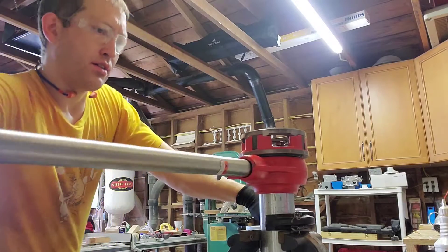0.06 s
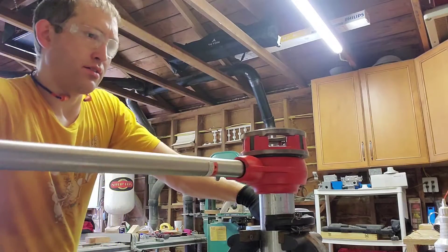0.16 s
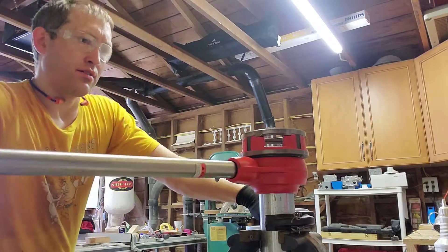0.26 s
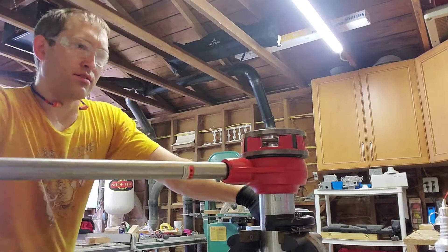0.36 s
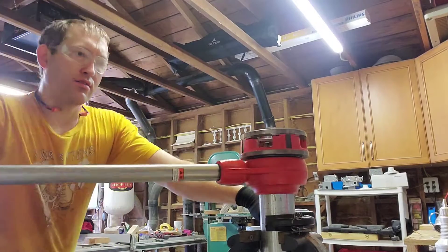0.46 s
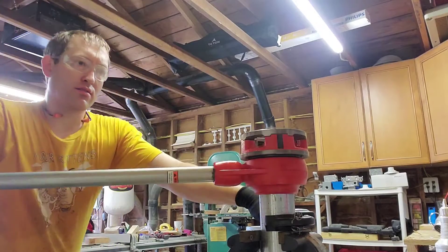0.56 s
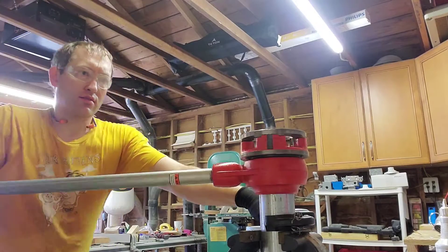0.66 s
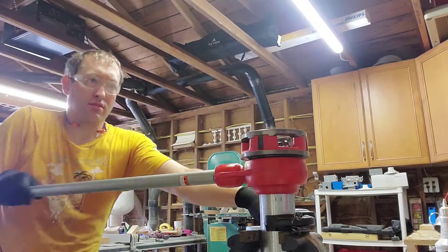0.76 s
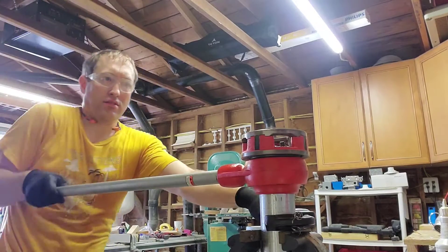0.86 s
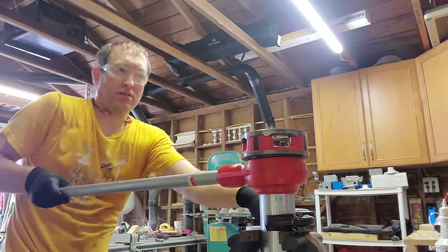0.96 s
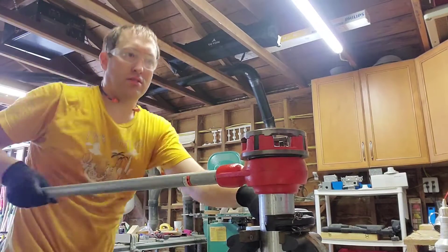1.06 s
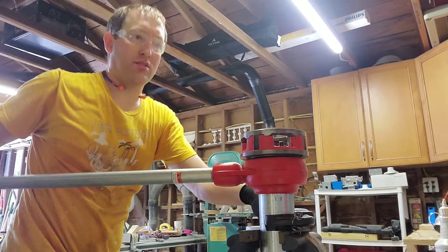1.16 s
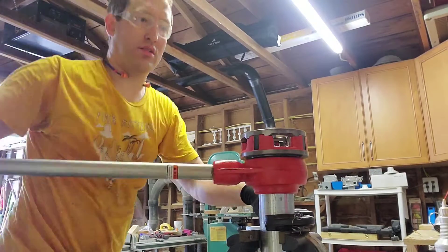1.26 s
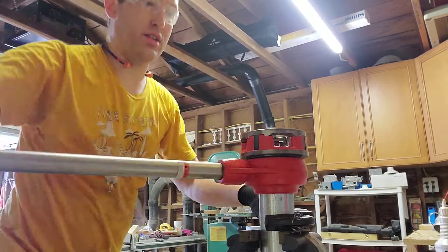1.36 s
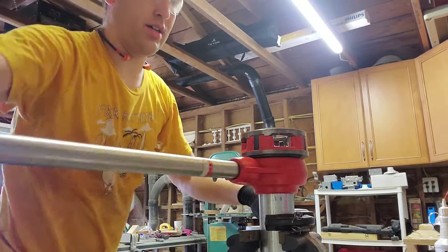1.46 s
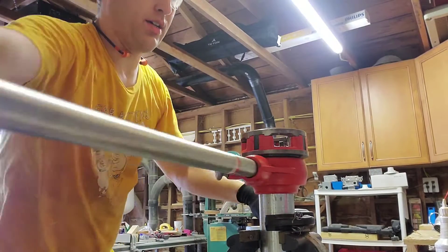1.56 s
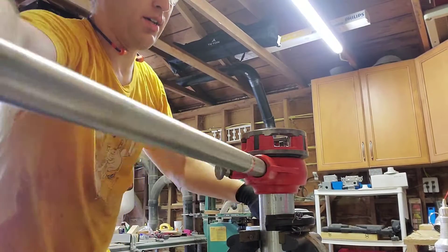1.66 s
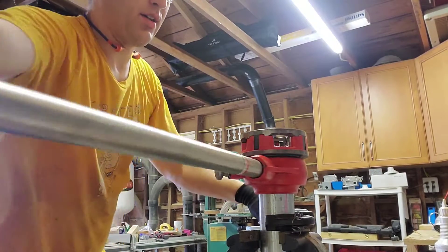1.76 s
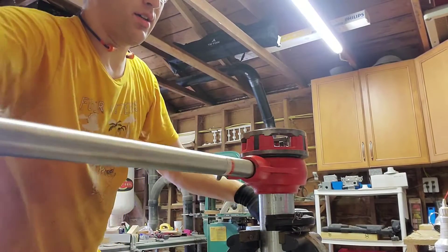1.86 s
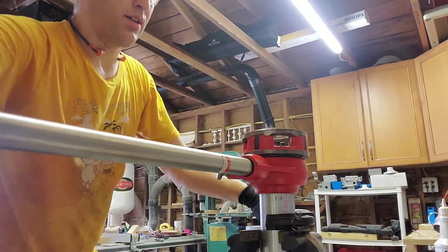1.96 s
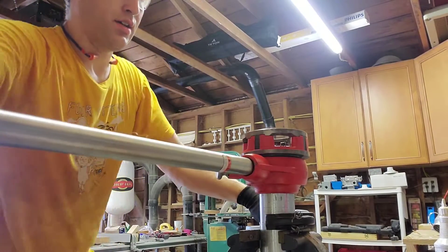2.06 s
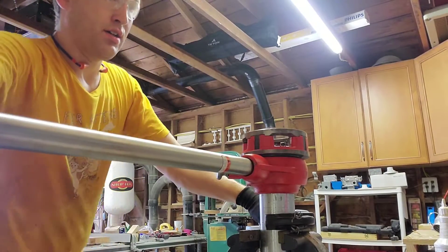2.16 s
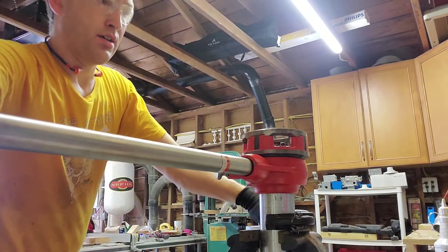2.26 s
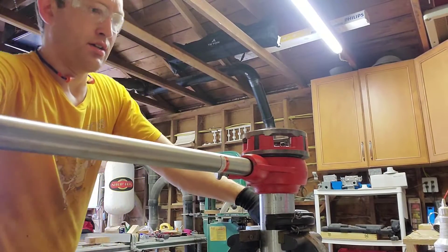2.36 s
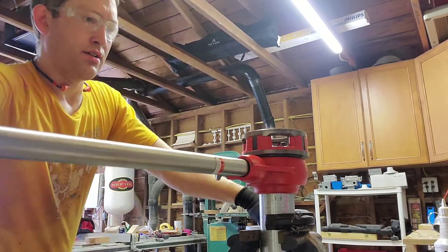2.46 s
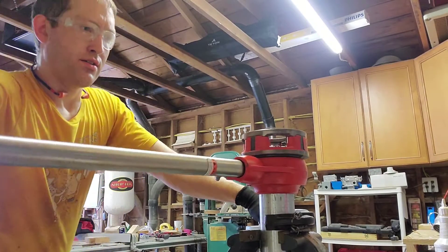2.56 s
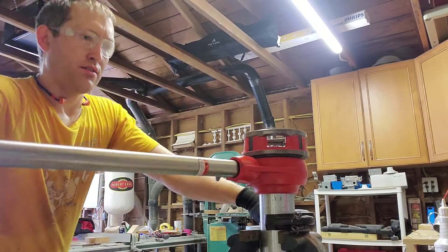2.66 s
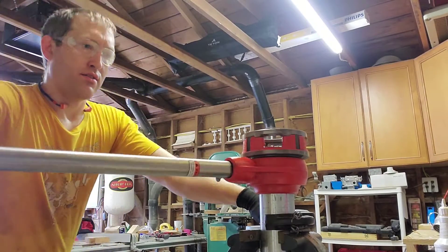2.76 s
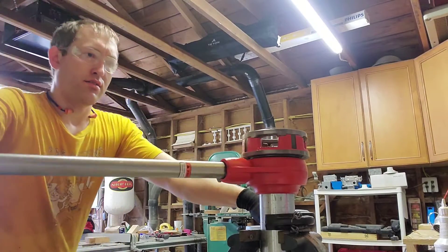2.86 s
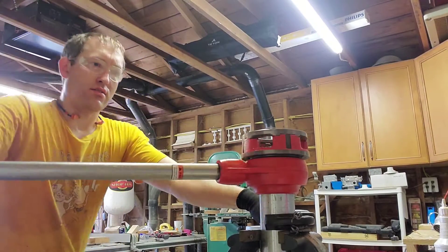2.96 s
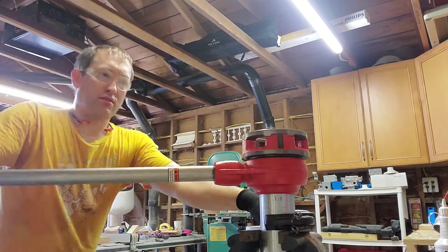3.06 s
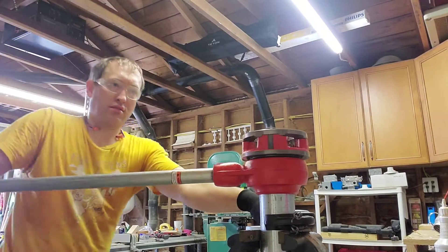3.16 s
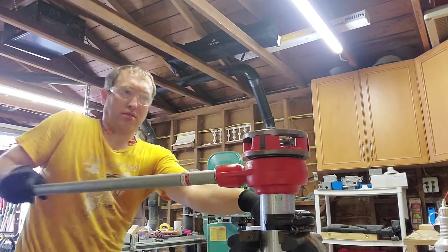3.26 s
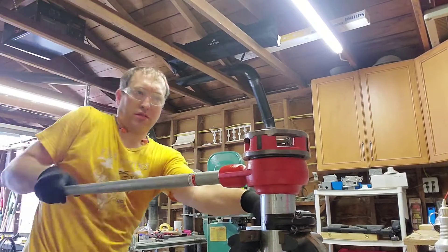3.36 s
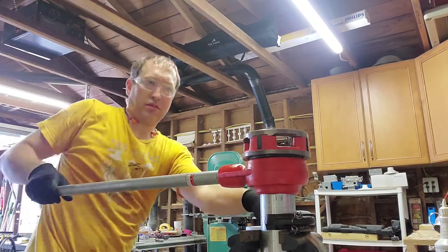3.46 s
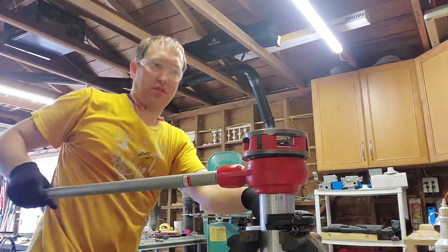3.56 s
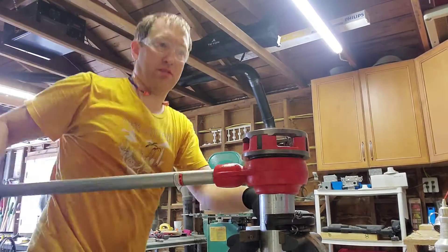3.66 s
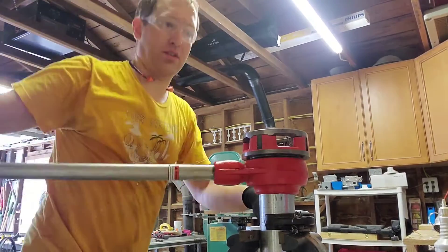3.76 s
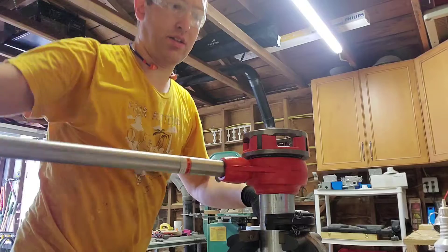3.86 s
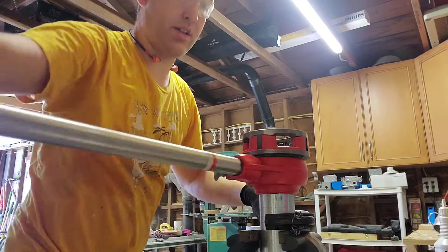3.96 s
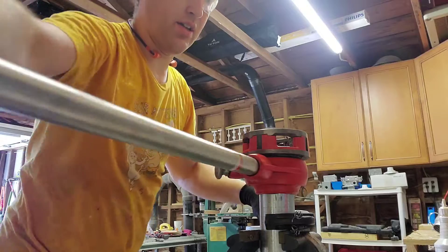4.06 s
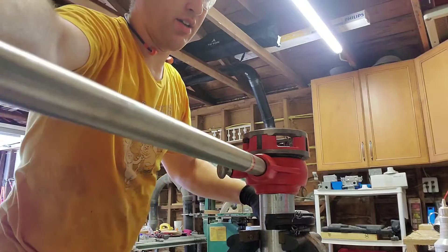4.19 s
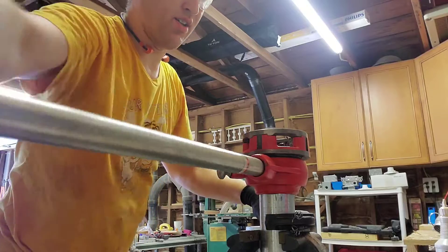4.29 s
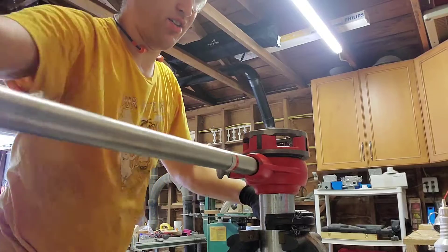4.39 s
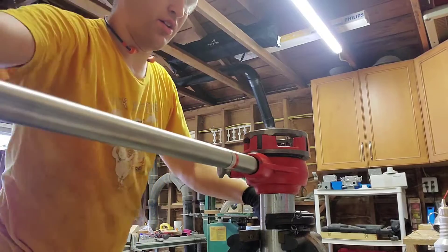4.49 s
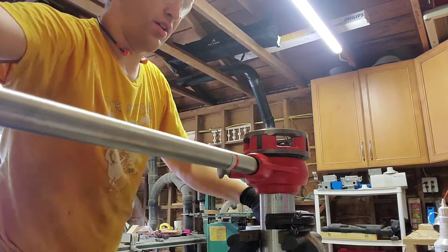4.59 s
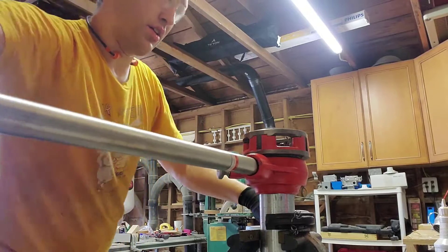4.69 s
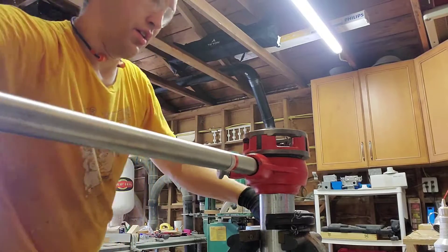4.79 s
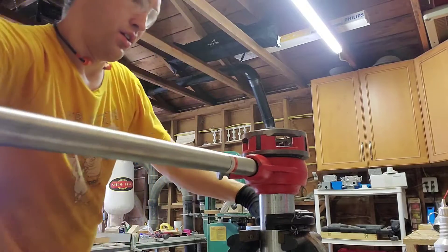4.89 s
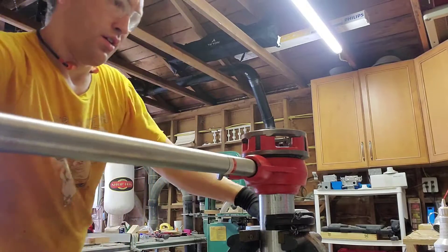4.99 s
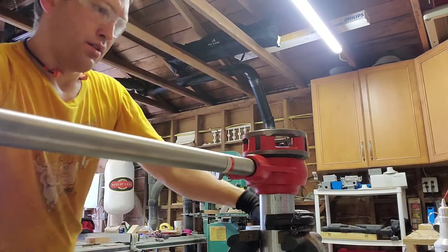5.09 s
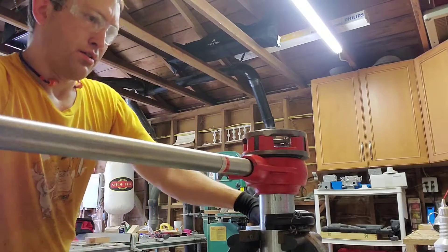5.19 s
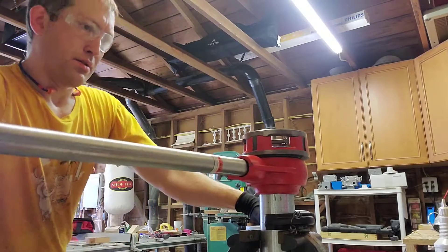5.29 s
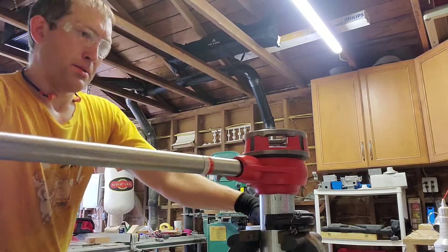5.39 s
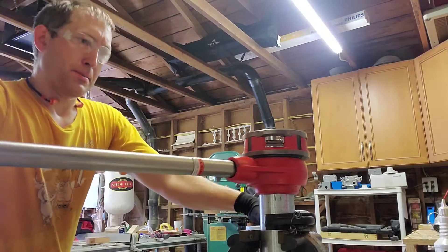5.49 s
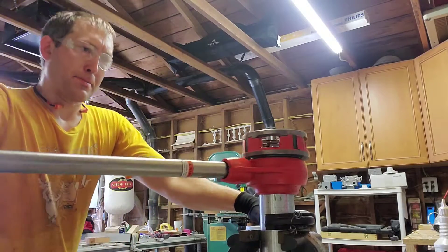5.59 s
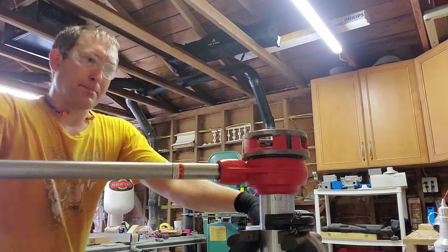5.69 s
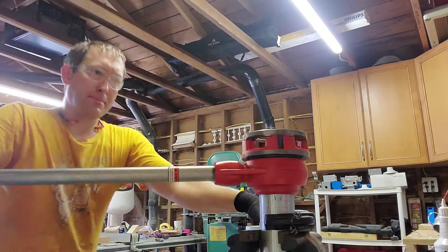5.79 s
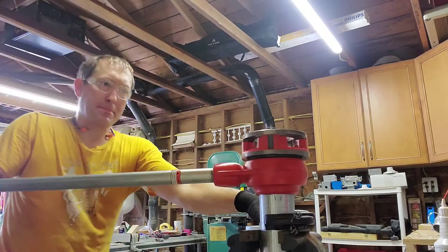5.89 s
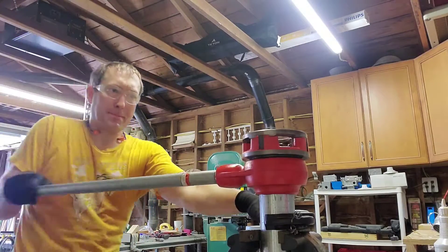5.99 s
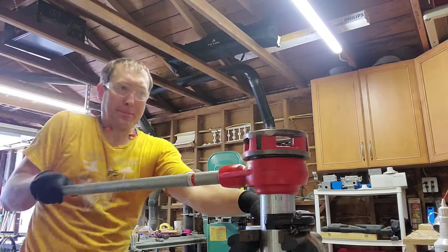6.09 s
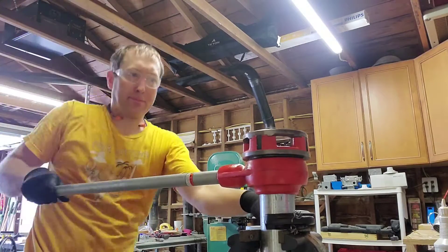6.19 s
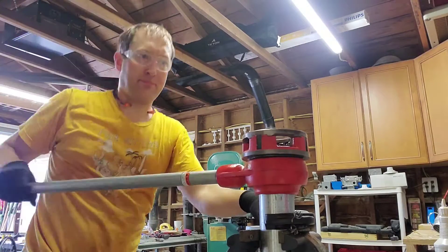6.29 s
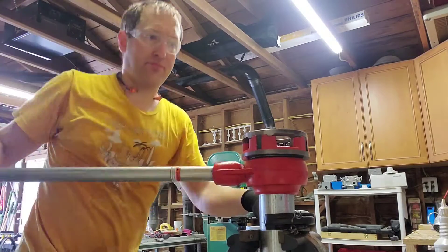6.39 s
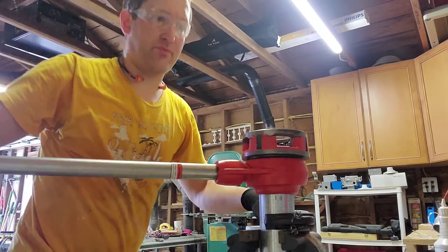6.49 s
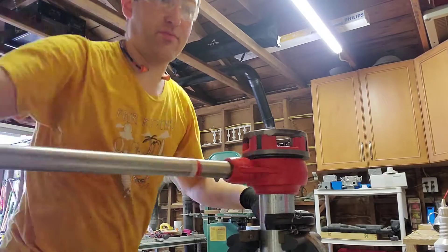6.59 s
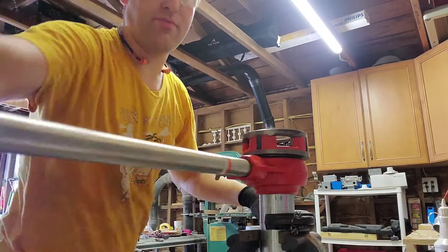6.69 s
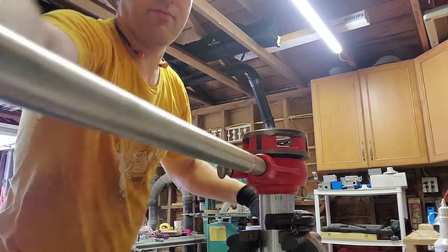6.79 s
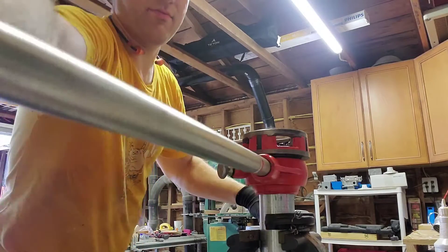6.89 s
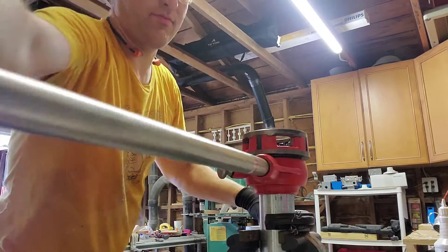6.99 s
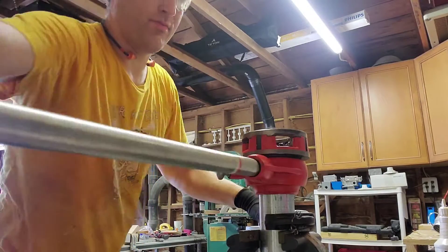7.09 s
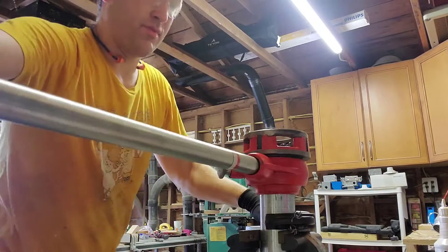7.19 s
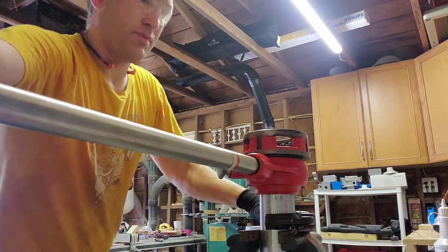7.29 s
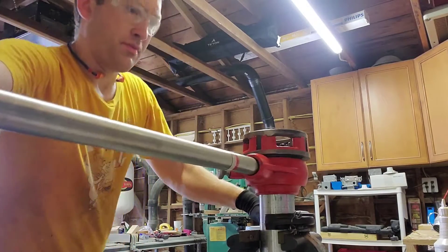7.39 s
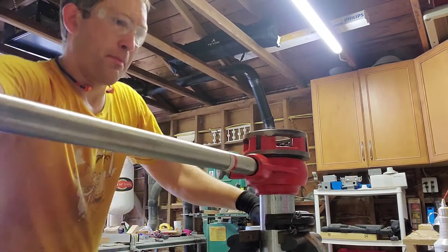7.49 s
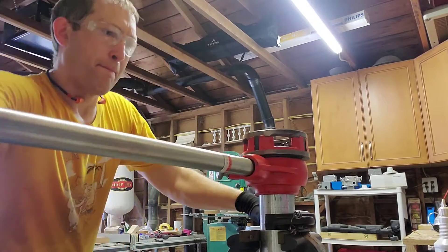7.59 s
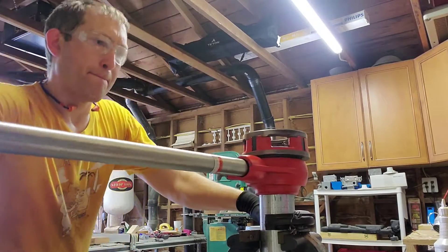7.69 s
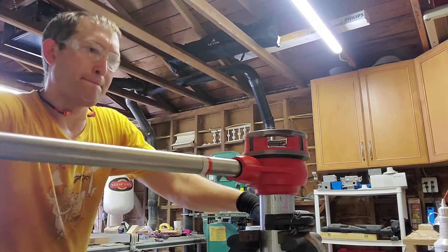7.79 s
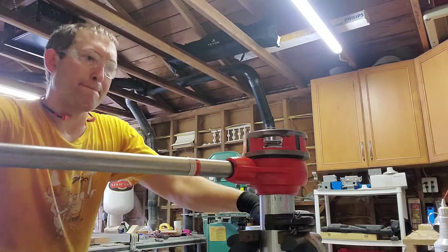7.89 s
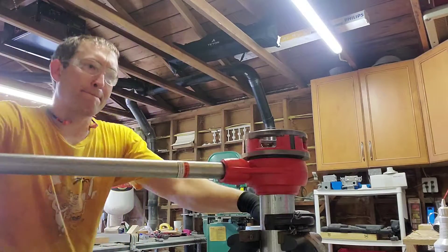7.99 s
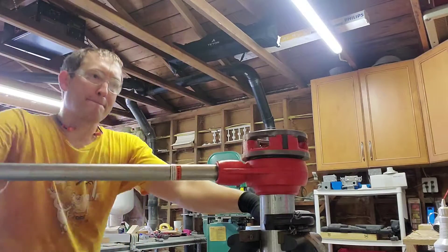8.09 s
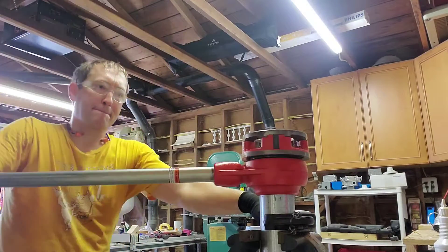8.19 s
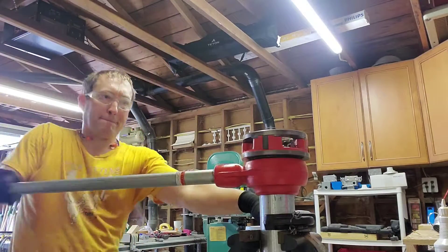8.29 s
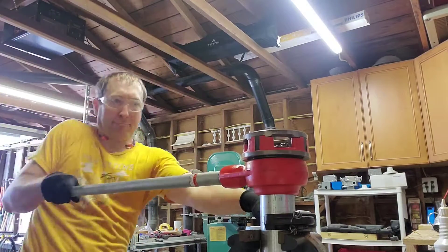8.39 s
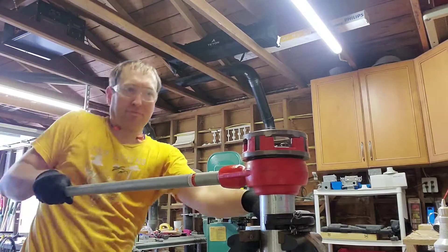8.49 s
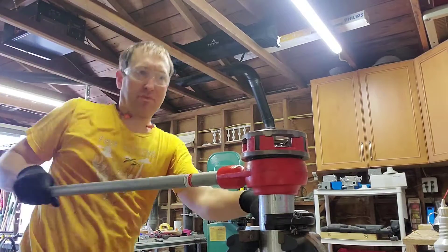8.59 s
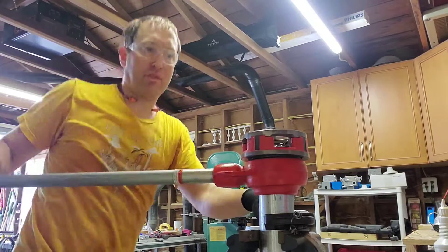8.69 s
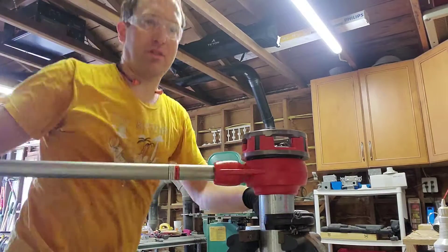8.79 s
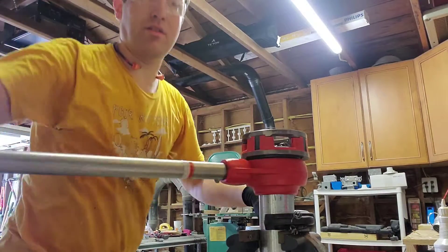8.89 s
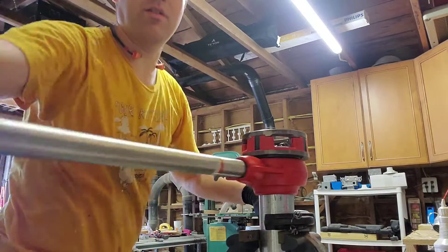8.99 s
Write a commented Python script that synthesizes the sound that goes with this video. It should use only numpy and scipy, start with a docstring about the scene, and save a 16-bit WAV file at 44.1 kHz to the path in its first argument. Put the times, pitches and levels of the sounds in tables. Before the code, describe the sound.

Close stereo pickup of a hand pipe threader in a garage workshop. Each slow pull builds a gritty, crunching scrape and low stand groan, then stops abruptly. The handle swings back with dull slack knocks, a soft rub and three or four sharp, ringing ratchet clicks, the last swing cut short after two. The cycle runs four times, with short dense echoes and faint low rumble.

```python
"""In a garage workshop, a hand ratchet threader cuts a thread on an oiled steel pipe held in a vice.
On each pull, streams of tiny fractures make the dies scrape and crunch while the vice stand groans and judders.
On each swing back the housing rubs, the head knocks in its slack and the pawl snaps over up to four teeth:
short bursts of noise ring the steel, and low sines make the thud and boom. A bench rumble, still air and
dense garage echoes surround the tool. The microphones sit close by, the right one facing the tool."""
import sys
import numpy as np
from scipy import signal
from scipy.fft import rfft, irfft, next_fast_len
from scipy.io import wavfile

SR = 44100
rng = np.random.default_rng(int(sys.argv[2]) if len(sys.argv) > 2 else 0)


def transcribe(signal):
    """Save signal, clipped to [-1, 1], as a 16-bit WAV file at the path in sys.argv[1]."""
    frames = np.atleast_2d(signal).T
    limited = np.clip(frames, -1, 1)
    pcm = np.round(limited * 32767).astype(np.int16)
    wavfile.write(sys.argv[1], SR, pcm)


N = 399105
TIME = np.arange(N) / SR

# spectrum of the bench rumble: pitch_hz, level_db (relative)
RUMBLE_SPECTRUM = [(20, -46), (40, -17), (62, -1.5), (85, -2), (115, -3), (150, -12), (215, -13.5),
                   (290, -25.5), (500, -25), (1200, -29.5), (4000, -44.5)]
# spectrum of the shop's still air: pitch_hz, level_db (relative)
AIR_SPECTRUM = [(30, 0), (200, -2), (400, -11), (700, -15), (1000, -15), (1700, -17), (2100, -22),
                (5000, -23), (6200, -24), (7400, -37), (9000, -34), (14500, -35)]
# how long the garage rings: pitch_hz, t60_s (time to fall by 60 dB)
ROOM_DECAY = [(100, 0.14), (400, 0.3), (1000, 0.38), (3000, 0.38), (6000, 0.26), (13000, 0.13)]
# how strongly the garage echoes: pitch_hz, level_db
ROOM_LEVEL = [(100, -3.5), (250, -6), (900, -8.5), (3000, -16), (6000, -13), (13000, -14)]
# left against right (minus is louder on the right): pitch_hz, left_right_db
BALANCE_BY_PITCH = [(200, 0), (700, -4), (1300, -6), (2400, -3), (4600, -8), (8000, 0.5), (15000, 0)]
# how alike left and right are, held within -1 to 1 when used: pitch_hz, likeness (no unit)
LIKENESS_BY_PITCH = [(130, .97), (265, 0.98), (345, -1.1), (460, 1), (620, -0.56), (790, 1), (910, -0.4),
                     (1150, 0.0058), (15000, -0.17)]
# low modes of pipe, vice and stand: pitch_hz, width_hz, cutting_db, struck_db, left_right_db
STAND_MODES = [(204, 36, 1, 0, -1.5), (166, 44, -6.5, -1.5, 1), (262, 90, -17, -12, -1),
               (368, 40, -7, -12, -16), (420, 60, -19, -18, 9), (490, 45, -17, -22, -3),
               (750, 70, -19, -13, 11), (870, 100, -16, -12.5, -4), (975, 70, -25, -15.5, -14)]
# resonances of the die head, relative to each other: pitch_hz, width_hz, level_db
HEAD_MODES = [(1520, 170, 5), (1820, 180, -3), (2370, 370, 4.5), (2740, 160, -5), (3300, 240, -1.5),
              (3850, 110, -3), (5210, 1000, -8), (6073, 120, -9), (8410, 360, -11), (10500, 200, -11),
              (11150, 300, -9), (12200, 500, -2), (13200, 500, -9)]
# spectrum of the sharp crack of steel on steel: pitch_hz, level_db (relative)
CRACK_SPECTRUM = [(300, -27.5), (600, -1.5), (1100, -2), (2000, -17), (3000, -1.5), (4400, -5.5),
                  (6300, -7), (7300, -23.5), (9500, -31.5), (12400, -11.5), (14000, -36.5), (15500, -49.5)]
# swings of the handle back: start_s, full_speed_s, slowing_s, rub_db (of the housing)
SWING_STROKES = [(1.14, 1.33, 1.48, -39), (3.62, 3.93, 4.16, -42), (6.38, 6.66, 6.74, -39.5),
                 (8.7, 8.97, 9.3, -41)]
# spectrum of the rubbing housing: pitch_hz, level_db (relative)
RUB_SPECTRUM = [(100, -1), (200, 12.5), (400, -6.5), (650, -4), (900, -0.5), (1600, -3.5), (2500, -15.5),
                (5000, -17.5), (8000, -23), (14000, -25)]
# the pawl riding up its first tooth: start_s, length_s, from_hz, to_hz, width_hz, level_db
TOOTH_SQUEAKS = [(1.266, 0.1, 1920, 2410, 254, -52), (1.292, .065, 4230, 4640, 300, -64),
                 (3.82, 0.054, 2150, 2400, 180, -59), (6.337, 0.069, 4690, 4680, 20, -54),
                 (6.482, .026, 2320, 2340, 20, -55), (8.847, 0.087, 1290, 1870, 91, -45.5)]
# boom, thud, clank, ring and tick, one row each: from_hz, to_hz
BLOW_BANDS = [(35, 140), (140, 480), (560, 1700), (2050, 6700), (8000, 14500)]
# head and handle knocking in their slack, levels before each band's trim:
# start_s, boom_db (bench), thud_db (stand), clank_db, ring_db (head)
SLACK_KNOCKS = [(1.142, -34, -46, -62, -81), (1.173, -26, -36, -54, -78), (1.197, -19.5, -24.5, -19.5, -42),
                (1.232, -23, -31, -40, -62), (1.257, -37.5, -27.5, -27, -55), (1.912, -55, -52, -74, -79),
                (2.03, -35, -38, -46, -85), (2.055, -23, -26.5, -35, -58), (2.078, -37, -45, -63, -76),
                (2.932, -17.5, -29, -37.5, -48), (3.597, -61, -37.5, -37, -75), (3.655, -27, -45, -51, -78),
                (3.686, -32, -30.5, -25.5, -52.5), (3.755, -25.5, -27.5, -33.5, -43.5),
                (3.806, -47, -36.5, -41, -56), (4.434, -31, -41.5, -104, -79),
                (4.479, -48, -46.5, -43.5, -61), (4.509, -27.5, -35.5, -59, -78),
                (4.525, -34.5, -32.5, -36, -61.5), (4.549, -27, -33, -56, -77),
                (4.593, -29.5, -44.5, -105, -86), (6.346, -56, -52, -65, -63), (6.374, -46, -40, -62, -66),
                (6.42, -30, -40, -50, -68), (6.437, -32.5, -35, -31, -50.5),
                (6.453, -26.5, -35.5, -54, -53.5), (7.129, -35, -41, -65, -80), (7.218, -36, -42, -59, -82),
                (7.233, -24, -41, -38.5, -74), (7.242, -25.5, -25, -39, -61), (8.669, -46, -44, -80, -83),
                (8.728, -30, -36.5, -45, -78), (8.79, -28, -35.5, -37, -60)]
# pawl drops, thud to tick before each band's trim: start_s, thud_db (stand), clank_db, ring_db (head),
# tick_db, main_hz, second_hz (the head's two strongest resonances), ping_hz, ping_db (the pawl's own)
PAWL_DROPS = [(1.371, -21, -24, -26.5, -27, 3900, 5900, 12000, -14),
              (1.479, -21, -26.5, -26, -28, 4100, 5050, 12250, -14.5),
              (1.588, -17, -20.5, -20.5, -25.5, 1670, 3170, 11500, -34),
              (1.725, -25, -30.5, -22, -25.5, 5150, 5400, 5100, -26),
              (3.88, -21.5, -20, -23, -29, 3270, 2700, 12440, -21),
              (3.976, -21, -20.5, -21.5, -30, 2620, 3770, 12200, -21.5),
              (4.089, -21, -19.5, -25.5, -25, 4150, 5960, 12200, -16),
              (4.241, -27.5, -26, -21.5, -35.5, 2380, 3370, 5950, -23),
              (6.573, -20.5, -22, -24.5, -26, 3850, 5330, 12200, -16),
              (6.667, -24, -33, -19, -24, 2650, 2920, 6000, -19.5),
              (6.775, -23, -23.5, -23, -27.5, 2300, 5800, 12200, -19),
              (6.911, -26, -26.5, -17.5, -28, 2250, 2400, 6040, -20),
              (8.918, -20.5, -20, -22, -26.5, 2760, 3900, 12200, -24),
              (9.012, -21, -20, -23, -27.5, 2620, 3500, 12600, -34)]
# the pawl's own high ring: pitch_hz, t60_s, level_db (relative)
PAWL_MODES = [(5230, .15, -7), (5480, .15, -7), (5970, .19, -3), (6510, .1, -7), (8480, .08, -3),
              (10870, .07, -7), (12170, .07, 0), (12650, .06, -5)]
# pulls of the handle: start_s, full_force_s, let_go_s, groan_db (stand), scrape_db (dies)
PULL_STROKES = [(0.03, 0.73, 0.94, -28.5, -37.5), (2.72, 3.22, 3.425, -25.5, -37),
                (5.3, 5.92, 6.15, -26.5, -36.5), (7.7, 8.22, 8.505, -24, -38.5)]
# grabs of the dies at set times, which shake the stand: peak_s, level_db (before the judder gain)
SET_GRABS = [(3.165, -12), (3.236, -7.5), (3.296, -8), (3.34, -9.5), (3.769, -6), (5.957, -7.5),
             (8.267, -5), (8.311, -9), (8.392, -10), (8.522, -7.5)]
# chips snapping off at set times: start_s, level_db (before the snap gain)
SET_CHIPS = [(0.212, -59), (0.381, -54), (5.18, -41), (5.632, -54), (5.997, -37), (8.307, -49)]
# spectrum of the scrape: pitch_hz, level_db (relative)
SCRAPE_SPECTRUM = [(150, -6), (400, -7.5), (620, 6), (900, 1.5), (1150, 1), (1600, 4.5), (2300, 2),
                   (3300, -4.5), (6000, -4), (7600, -22.5), (9000, -19), (11800, -6), (14500, -23.5)]
# resonances that colour the scrape, relative to each other: pitch_hz, width_hz, level_db
DIE_MODES = [(970, 32, 17), (1475, 39, 7), (1670, 19, 8.5), (1830, 17, 13), (2110, 48, -2.5),
             (2544, 110, 6.5), (3184, 190, 8), (3683, 95, 7), (4710, 120, -16.5), (5760, 220, -28),
             (8500, 140, 18.5)]

# still air, and the top of the sound
AIR_DB, EDGE_HZ = -58, 14900
# the bench rumbles a little at rest, and more under each pull (against its groan) and swing (against its rub)
REST_DB, PULL_ROCK_REL_DB, SWING_ROCK_REL_DB = -41, -17, -2
ROCK_RISE_DB_PER_S, ROCK_SETTLE_DB_PER_S = 49, 26.5
# the rumble comes in uneven surges
ROCK_SURGE_DB, ROCK_SURGE_HZ = 2.2, 7
SWING_RISE_DB_PER_S, SWING_FALL_DB_PER_S = 55, 56
# the rub swells just before each pawl drop
CLIMB_S, CLIMB_DB = 0.043, 6
# loose parts bounce for a moment after a blow
RATTLE_PER_S, RATTLE_S = 220, .018
# a knock has little tick against its ring, and favours two low resonances
KNOCK_TICK_REL_DB, KNOCK_HZ = -40.5, (590, 1210)
# the boom of the bench follows the thud of a pawl drop
PAWL_BOOM_REL_DB = -4.5
# each pawl mode is a close cluster (relative spread); modes near a drop's ping are boosted
PING_SPLIT, PING_FAVOUR_DB, PING_FAVOUR_HZ = .014, 18, 600
# force builds steadily and drops quickly; the scrape peaks a little after the groan
GROAN_RISE_DB_PER_S, LET_GO_DB_PER_S = 40, 200
SCRAPE_RISE_DB_PER_S, SCRAPE_FALL_DB_PER_S, SCRAPE_LAG_S = 28.5, 161.5, 0.066
# further grabs follow the groan, before the judder gain; pitch varies from grab to grab (relative spread)
GRABS_PER_S, GRAB_REL_DB, JUDDER_DETUNE = 11, 10.5, .06
# further chips break at random while the dies cut; level against the scrape, before the snap gain
CHIPS_PER_S, CHIP_REL_DB = 6.5, -16
# small tears crunch within the scrape
CRUNCH_PER_S, CRUNCH_REL_DB, CRUNCH_SPREAD_DB, CRUNCH_S = 110, -1, 7, .005
CRUNCH_LOW_HZ, CRUNCH_HIGH_HZ = 750, 2900
# the load passes between two cutting edges: swing in radians, rate, second edge's pitch against the first
EDGE_TRADE, EDGE_TRADE_HZ, EDGE_STRETCH = .9, 7, 1.04
# the scrape is a dense stream of fractures
SCRAPE_GRAINS_PER_S, SCRAPE_SPREAD_DB = 8000, 1.8


def amp(db):
    """Turns decibels into gain."""
    return 10 ** (np.asarray(db) / 20)


def unit(x):
    """Scales a sound to an average (rms) strength of 1."""
    return x / np.sqrt(np.mean(x ** 2) + 1e-20)


def read(points, hz):
    """Reads a table along a logarithmic pitch axis."""
    f, value = np.transpose(points)
    return np.interp(np.log(hz + 1), np.log(f + 1), value)


def add(mix, s, sound):
    """Mixes a stereo sound in at time s."""
    part = mix[:, max(round(s * SR), 0):][:, :sound.shape[1]]
    part += sound[:, :part.shape[1]]


def band(x, edges, order=3):
    """Keeps only the pitches between two edges."""
    return signal.sosfilt(signal.butter(order, edges, "band", fs=SR, output="sos"), x)


def noise(length):
    """Two unrelated streams of white noise."""
    return rng.standard_normal((2, length))


def wander(rate_hz):
    """Smooth random curve of rms 1, changing mostly below the given rate."""
    hz = np.fft.rfftfreq(N // 32, 32 / SR)
    slow = irfft(rfft(rng.standard_normal(N // 32)) / (1 + (hz / rate_hz) ** 4))
    return unit(np.interp(TIME, np.linspace(0, N / SR, len(slow)), slow))


def grains(per_s, spread_db):
    """Tiny fractures at random instants: most faint, a few large."""
    size = amp(spread_db * np.minimum(rng.exponential(1, N), 5))
    happens = rng.random(N) < per_s / SR
    return unit(size * happens * noise(N))


def resonance(hz, centre_hz, width_hz):
    """Complex response of one ringing mode, gain 1 at its centre."""
    return 1 / (1 + 1j * (hz ** 2 - centre_hz ** 2) / (width_hz * (hz + 1e-3)))


def sides(db):
    """Left and right gains for a level difference."""
    return amp(np.array([db, -db]).reshape(2, -1) / 2)


def at_mics(drive, response):
    """Filters two unrelated drives, blended so that left and right are as alike as the likeness table says."""
    n = next_fast_len(drive.shape[1] + SR // 10, True)
    hz = np.fft.rfftfreq(n, 1 / SR)
    a, b = rfft(drive, n)
    same = np.clip(read(LIKENESS_BY_PITCH, hz), -1, 1)
    pair = np.array([a, same * a + np.sqrt(1 - same ** 2) * b])
    return irfft(pair * response(hz), n)[:, :drive.shape[1]]


def colour(points):
    """Response with a given spectrum and left-right balance, whose sound never precedes its cause."""
    def response(hz):
        log_gain = np.log(amp(read(points, hz)))
        # minimum phase, from the first half of the cepstrum
        cepstrum = irfft(log_gain)
        phase = 2 * rfft(cepstrum * (np.arange(len(cepstrum)) < len(hz))).imag
        return np.exp(log_gain + 1j * phase) * sides(read(BALANCE_BY_PITCH, hz))
    return response


def strokes(table, column, rise_db_s, fall_db_s, lag_s=0, onset_db_s=220):
    """Gain of handle strokes: each sets in, builds to the level in one column, holds and dies away."""
    gain = np.zeros(N)
    for row in table:
        start_s, full_s, end_s = row[:3]
        onset_db = onset_db_s * np.maximum(start_s - TIME, 0)
        build_db = rise_db_s * np.maximum(full_s + lag_s - TIME, 0)
        fade_db = fall_db_s * np.maximum(TIME - end_s, 0)
        gain += amp(row[column] - (onset_db + build_db + fade_db))
    return gain


def scattered(gain, per_s, rel_db, spread_db, count=200):
    """Rows (start_s, level_db) at uneven intervals while a gain is up, their strength following it."""
    gap, luck = rng.random((count, 2)).T
    times = np.cumsum(.5 + gap) / per_s
    strength = np.interp(times, TIME, gain, right=0)
    return [(s, 20 * np.log10(g) + rel_db + spread_db * (2 * u - 1))
            for s, g, u in zip(times, strength, luck) if g > gain.max() / 10]


def background():
    """The bench rumbles under the shifting load, over the still air of the shop: both are filtered noise."""
    speeds = dict(rise_db_s=ROCK_RISE_DB_PER_S, fall_db_s=ROCK_SETTLE_DB_PER_S)
    pulled = strokes(PULL_STROKES, column=3, **speeds)
    swung = strokes(SWING_STROKES, column=3, **speeds)
    rocking = amp(REST_DB) + amp(PULL_ROCK_REL_DB) * pulled + amp(SWING_ROCK_REL_DB) * swung
    surges = amp(ROCK_SURGE_DB * wander(ROCK_SURGE_HZ))
    rumble = unit(at_mics(noise(N), colour(RUMBLE_SPECTRUM))) * rocking * surges
    air = amp(AIR_DB) * unit(at_mics(noise(N), colour(AIR_SPECTRUM)))
    return rumble + air


def garage(x, first_s=0.00053):
    """Dense echoes off rafters and cabinets, each pitch band dying at its own speed."""
    taps = noise(SR // 2) * (rng.random((2, SR // 2)) < 5000 / SR)
    hz, t, z = signal.stft(unit(at_mics(taps, np.ones_like)), SR, nperseg=256)
    t60 = read(ROOM_DECAY, hz)[:, None]
    level_db = read(ROOM_LEVEL, hz)[:, None]
    # the last factor keeps a band's echo strength independent of its decay time
    z = z * amp(level_db - 60 * t / t60) * np.sqrt(2 * np.log(1000) / (t60 * SR))
    tail = signal.istft(z, SR, nperseg=256)[1]
    tail = tail * np.minimum(np.arange(tail.shape[1]) / (first_s * SR), 1) ** 2
    return signal.fftconvolve(x, tail, axes=1)[:, :N]


def nearby(hz, strength=.3, count=7):
    """Reflections off the handle, vice and bench comb the treble, differently at each microphone."""
    delay_s = rng.uniform(.0004, .006, (count, 2, 1))
    echoes = sum(np.exp(-2j * np.pi * hz * d) * rng.choice([-1, 1]) for d in delay_s)
    return 1 + strength * echoes * hz ** 2 / (hz ** 2 + 900 ** 2)


def swinging():
    """The oiled housing rubs round the die head on the way back, harder as the pawl climbs each tooth."""
    rub = strokes(SWING_STROKES, column=3, rise_db_s=SWING_RISE_DB_PER_S, fall_db_s=SWING_FALL_DB_PER_S)
    climb = sum(np.exp(-abs(TIME - row[0]) / CLIMB_S) * (TIME < row[0]) for row in PAWL_DROPS)
    friction = grains(6000, 2.9) * amp(2.4 * wander(45))
    texture = unit(at_mics(friction, lambda hz: colour(RUB_SPECTRUM)(hz) * nearby(hz, count=4)))
    return rub * amp(CLIMB_DB * climb) * texture


def squeaks():
    """Rubbing steel picks out one gliding resonance: wide ones sound gritty, narrow ones pure."""
    out = np.zeros((2, N))
    for s, length_s, from_hz, to_hz, width_hz, db in TOOTH_SQUEAKS:
        hz = np.linspace(from_hz, to_hz, int(length_s * SR))
        r = np.exp(-np.pi * width_hz / SR)
        drive = noise(SR // 2) + 1j * noise(SR // 2)
        # only the settled end of the smoothed noise is used
        grit = signal.lfilter([1 - r], [1, -r], drive)[:, -len(hz):]
        squeak = unit((grit * np.exp(2j * np.pi * np.cumsum(hz) / SR)).real)
        fade = signal.windows.tukey(len(hz), .5)
        add(out, s, amp(db) * squeak * fade * sides(read(BALANCE_BY_PITCH, from_hz)))
    return out


def stand(hz, column):
    """Response of the stand's modes, with the levels of one column."""
    return sum(amp(m[column]) * sides(m[-1]) * resonance(hz, m[0], m[1]) for m in STAND_MODES)


def head(hz, stand_db, peak_db=-7.5):
    """Response of the die head: resonances over a broad crack, with some of the stand."""
    peaks = sum(amp(db + peak_db) * resonance(hz, f, width) for f, width, db in HEAD_MODES)
    shaken = amp(stand_db) * stand(hz, column=3) * resonance(hz, 915, 580)
    return peaks * sides(read(BALANCE_BY_PITCH, hz)) + colour(CRACK_SPECTRUM)(hz) + shaken


def blows(table, rise_s, crack_s, chatter_db, chatter_s, rattle_db, soft_hz, stand_db, main_db,
          main_width_hz, scuff_db, sway_s, boom_s, register_db):
    """A contact and its small bounces ring the head, and the push sways the stand and bumps the bench."""
    out, t = np.zeros((2, N)), np.arange(SR // 4) / SR
    fade = np.exp(-t / crack_s) + amp(chatter_db) * np.exp(-t / chatter_s)
    contact = (1 - np.exp(-t / rise_s)) * fade
    hz = np.fft.rfftfreq(next_fast_len(len(t) + SR // 10, True), 1 / SR)
    ringing = head(hz, stand_db) / (1 + 1j * hz / soft_hz)
    for s, *levels, main_hz, second_hz in table:
        bounces = (rng.random(len(t)) < RATTLE_PER_S / SR) * amp(rattle_db) * np.exp(-t / RATTLE_S)
        force = contact + signal.fftconvolve(bounces, contact)[:len(t)]
        # the spot that is struck favours two resonances
        favoured = sum(resonance(hz, f, main_width_hz) for f in (main_hz, second_hz))
        spot = 1 + amp(main_db) * favoured
        metal = at_mics(force * noise(len(t)), lambda hz: ringing * nearby(hz) * spot)
        # each stand mode is a fading sine of uneven strength and pitch
        sway = 0
        for f, width, _, db, pan in STAND_MODES:
            gain = amp(db) * sides(pan) * rng.uniform(0.17, 4.7)
            wave = np.sin(2 * np.pi * f * rng.normal(1, 0.04) * t)
            sway = sway + gain * np.exp(-np.pi * width * .6 * t) * wave
        scuff = at_mics(np.exp(-t / sway_s) * noise(len(t)), lambda hz: resonance(hz, 160, 170))
        sway = unit(sway) + amp(scuff_db) * unit(scuff)
        boom = np.exp(-t / boom_s) * np.sin(2 * np.pi * 95 * rng.normal(1, .14) * t) * np.ones((2, 1))
        sources = (boom, sway, metal, metal, metal)
        for source, edges, db, trim_db in zip(sources, BLOW_BANDS, levels, register_db):
            part = band(source, edges, order=3 if source is metal else 2)
            # level is set by the first 20 ms of metal, or 40 ms of the low parts
            strength = np.sqrt(np.mean(part[:, :SR // (50 if source is metal else 25)] ** 2))
            add(out, s, amp(db + trim_db) * part / strength)
    return out


def knocks():
    """The handle takes up its slack with a dull, rattling clunk."""
    rows = [(s, boom, thud, clank, ring, ring + KNOCK_TICK_REL_DB, *KNOCK_HZ)
            for s, boom, thud, clank, ring in SLACK_KNOCKS]
    return blows(rows, rise_s=0.0006, crack_s=0.004, chatter_db=-25, chatter_s=0.018, rattle_db=-10,
                 soft_hz=2200, stand_db=2, main_db=-1, main_width_hz=280, scuff_db=1.5, sway_s=0.024,
                 boom_s=.026, register_db=(-1.5, 2, -2.5, 7, 23.0))


def pings(count=6):
    """After each drop the pawl rings on by itself, in beating clusters of sines."""
    out, t = np.zeros((2, N)), np.arange(SR // 4) / SR
    modes_hz, t60s, modes_db = np.transpose(PAWL_MODES)
    for s, *_, ping_hz, db in PAWL_DROPS:
        closeness = abs(resonance(modes_hz, ping_hz, PING_FAVOUR_HZ)) ** 4
        shares = amp(modes_db) * (1 + amp(PING_FAVOUR_DB) * closeness)
        for hz, t60, share in zip(modes_hz, t60s, shares / np.linalg.norm(shares)):
            cluster_hz = hz * rng.normal(1, PING_SPLIT, (count, 1, 1))
            cycles = cluster_hz * t + rng.random((count, 2, 1))
            cluster = np.sin(2 * np.pi * cycles).sum(0) / np.sqrt(count)
            add(out, s, share * amp(db - 60 * t / t60) * sides(read(BALANCE_BY_PITCH, hz)) * cluster)
    return out


def pawl():
    """The pawl drops off each tooth on to the next, with a hard, bright blow and its own ping."""
    rows = [(s, thud + PAWL_BOOM_REL_DB, thud, *metal) for s, thud, *metal, _, _ in PAWL_DROPS]
    drops = blows(rows, rise_s=0.0002, crack_s=0.0022, chatter_db=-22, chatter_s=0.03, rattle_db=-22,
                  soft_hz=20000, stand_db=8, main_db=5, main_width_hz=480, scuff_db=-2.5, sway_s=0.034,
                  boom_s=.045, register_db=(-2, -2.7, 1.0, 1.0, 1.0))
    return pings() + drops


def groan_gain():
    """How hard the pulls load the stand."""
    return strokes(PULL_STROKES, column=3, rise_db_s=GROAN_RISE_DB_PER_S, fall_db_s=LET_GO_DB_PER_S)


def scrape_gain():
    """How hard the dies bite."""
    return strokes(PULL_STROKES, column=4, rise_db_s=SCRAPE_RISE_DB_PER_S,
                   fall_db_s=SCRAPE_FALL_DB_PER_S, lag_s=SCRAPE_LAG_S)


def judders(pitch_hz=204, swell_s=.011, gain_db=-6):
    """Stick and slip locks on to the stand's main mode for a few cycles."""
    out, t = np.zeros((2, N)), np.arange(-SR // 20, SR // 20) / SR
    for s, db in SET_GRABS + scattered(groan_gain(), GRABS_PER_S, GRAB_REL_DB, spread_db=7.0):
        cycles = pitch_hz * rng.normal(1, JUDDER_DETUNE) * t + rng.random()
        shudder = np.exp(-(t / swell_s) ** 2) * np.sin(2 * np.pi * cycles)
        add(out, s + t[0], amp(db + gain_db) * shudder * sides(-1.3))
    return out


def snaps(decay_s=0.0034, gain_db=5):
    """Chips break off with a thin tick: a brief burst of noise with little bass."""
    out, t = np.zeros((2, N)), np.arange(SR // 50) / SR
    thin = colour([(500, -46.0), (2500, 4.0), (5500, 0.5), (7500, -6.5), (11000, 0.5), (15000, -4.0)])
    for s, db in SET_CHIPS + scattered(scrape_gain(), CHIPS_PER_S, CHIP_REL_DB, spread_db=5):
        tick = unit(at_mics(np.exp(-t / decay_s) * noise(len(t)), thin))
        add(out, s, amp(db + gain_db) * tick)
    return out


def crunch(count=1400):
    """Small tears in the steel: each is a tiny burst with a pitch of its own."""
    out, t = np.zeros((2, N)), np.arange(SR // 50) / SR
    tears = scattered(scrape_gain(), CRUNCH_PER_S, CRUNCH_REL_DB, CRUNCH_SPREAD_DB, count=count)
    for (s, db), (pitch, late, phase) in zip(tears, rng.random((count, 3))):
        hz = CRUNCH_LOW_HZ * (CRUNCH_HIGH_HZ / CRUNCH_LOW_HZ) ** pitch
        # the right side starts at a phase of its own
        wave = np.sin(2 * np.pi * hz * t + np.pi * np.array([[0], [phase]]))
        burst = (1 - np.exp(-t * hz)) * np.exp(-t / CRUNCH_S) * wave
        add(out, s + late / CRUNCH_PER_S, amp(db) * burst * sides(read(BALANCE_BY_PITCH, hz)))
    return out


def dies(hz, stretch):
    """Response of one cutting edge, its resonances shifted in pitch by the stretch."""
    peaks = sum(amp(db) * resonance(hz, f * stretch, width) for f, width, db in DIE_MODES)
    return colour(SCRAPE_SPECTRUM)(hz) * (1 + 1.02 * peaks) * nearby(hz, count=3)


def cutting():
    """The dies tear chips in fits and starts: dense grains drive the groan and a scrape of shifting colour."""
    fits = wander(32)
    groan_drive = grains(2500, 2.35) * amp(1.0 * fits)
    groan = unit(at_mics(groan_drive, lambda hz: stand(hz, column=2) * resonance(hz, 268, 240)))
    grit = amp(1.3 * fits + 1.1 * wander(130))
    load = EDGE_TRADE * wander(EDGE_TRADE_HZ)
    scrape = np.zeros((2, N))
    for share, stretch in ((np.cos(load), 1), (np.sin(load), EDGE_STRETCH)):
        drive = grains(SCRAPE_GRAINS_PER_S, SCRAPE_SPREAD_DB) * grit
        scrape += share * unit(at_mics(drive, lambda hz: dies(hz, stretch)))
    return groan * groan_gain() + scrape * scrape_gain()


def scene():
    """Pulls and swings back in the garage; chips snap close by, a little weaker in the echoes."""
    tool = pawl() + knocks() + cutting() + crunch() + judders() + swinging() + squeaks()
    chips = snaps()
    return tool + chips + garage(tool + amp(-1.0) * chips) + background()


def record(dry):
    """Flattens peaks beyond full scale, then cuts the treble above the band edge."""
    lowpass = signal.firwin(161, EDGE_HZ, window=("kaiser", 8), fs=SR)
    return signal.oaconvolve(np.clip(dry, -1, 1), lowpass[None], "same")


dry = scene()
out = record(dry)
transcribe(out)
```